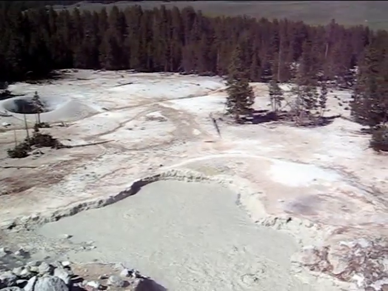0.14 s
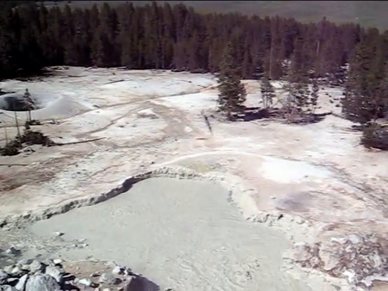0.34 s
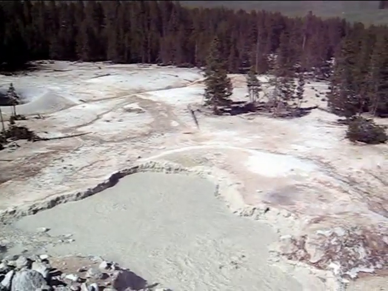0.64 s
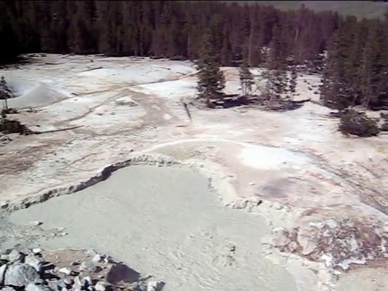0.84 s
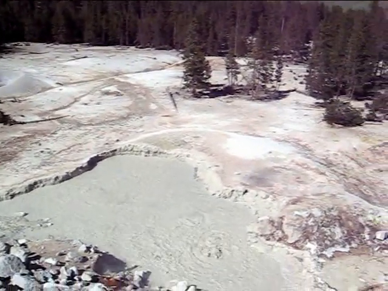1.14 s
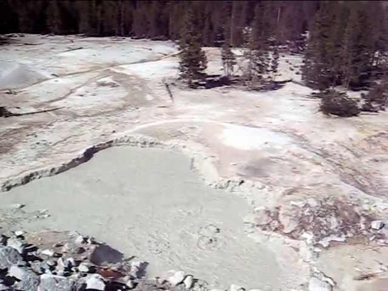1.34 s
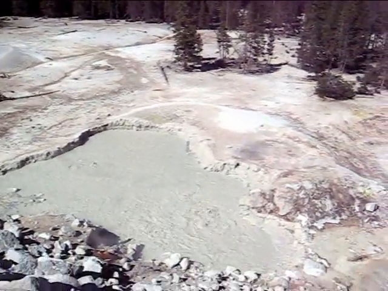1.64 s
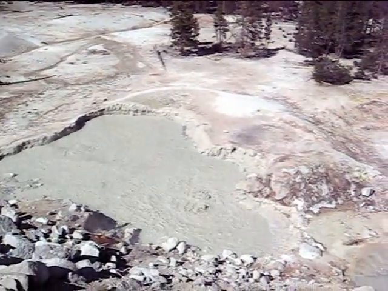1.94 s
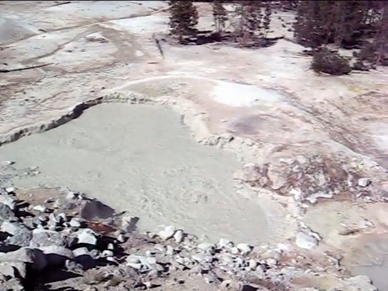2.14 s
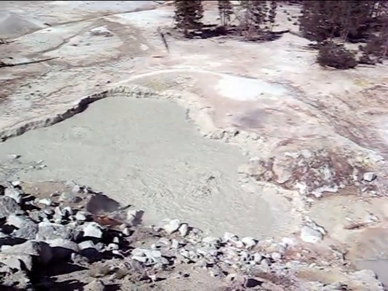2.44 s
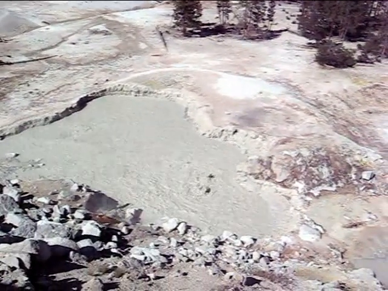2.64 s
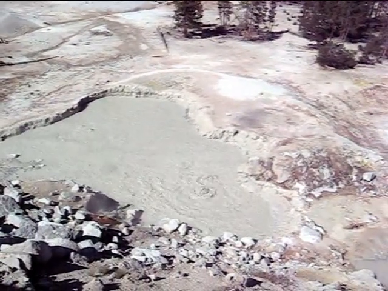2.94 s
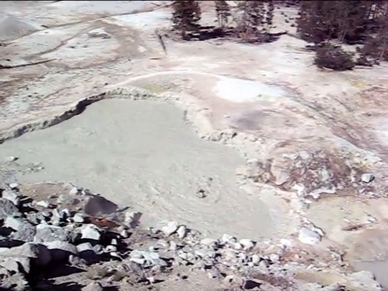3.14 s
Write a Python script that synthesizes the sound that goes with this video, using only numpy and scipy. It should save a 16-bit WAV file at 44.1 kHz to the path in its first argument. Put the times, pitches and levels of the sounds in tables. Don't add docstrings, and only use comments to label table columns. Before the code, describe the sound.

A thermal mud pool seethes throughout with grainy hiss, wet splats and hollow plops. Behind it an eight-cylinder engine coasts, its hollow pipe ring fading as pitch sags until 0.7 s; it catches by 0.9 s and pulls away with a deep, loping boom over tyre roar and low rumble. Plops cluster at 1.5-2.1 s, then thin out, with a blunt one near 3.2 s. Outdoors, dull small camera microphone, automatic gain.

```python
import sys
import numpy as np
from scipy import signal
from scipy.io import wavfile
from scipy.ndimage import uniform_filter1d

SR = 44100
rng = np.random.default_rng(int(sys.argv[2]) if len(sys.argv) > 2 else 0)


def natural_amplitude(level_db):
    exponent = np.asarray(level_db, float) / 20
    return 10 ** exponent


def unload_audio(sound):
    columns = np.transpose(np.atleast_2d(sound))
    steps = np.round(np.clip(columns, -1, 1) * 32767)
    wavfile.write(sys.argv[1], SR, steps.astype(np.int16))


N = 144648
RUN_IN = 4096


def rms_one(x):
    return x / np.sqrt(np.mean(x ** 2) + 1e-20)


def in_time(rows):
    s, *columns = np.transpose(rows)
    return [np.interp(np.arange(N) / SR, s, c) for c in columns]


def drift(rate_hz):
    hop = 40
    pole = np.exp(-2 * np.pi * rate_hz * hop / SR)
    noise = rng.standard_normal(N // hop + 2002)
    slow = signal.lfilter([1], [1, -2 * pole, pole * pole], noise)[2000:]
    return np.interp(np.arange(N) / hop, np.arange(len(slow)), rms_one(slow - slow.mean()))


def banded(spectrum, white, shared_db, own_db):
    hz, db = np.transpose(spectrum)
    edges = hz[0] * 2 ** np.arange(-1 / 3, np.log2(hz[-1] / hz[0]) + 1 / 3, 1 / 3)
    out, together = 0, drift(22.0)
    for k, (low, high) in enumerate(zip(edges, edges[1:])):
        bandpass = signal.butter(2, [low, high], "band", fs=SR, output="sos")
        band = signal.sosfilt(bandpass, white[k % 2])[RUN_IN:]
        level_db = np.interp(np.log(low * high) / 2, np.log(hz), db)
        out = out + band * natural_amplitude(level_db + shared_db * together + own_db * drift(15.0))
    return rms_one(out)


def pool(seethe_db):
    # frequency in Hz, level in dB per Hz.
    seethe_colour = [(530, -23.5), (900, -11), (949, -14), (1270, 0.5), (1980, -7.5), (2850, -10),
                     (3070, -10), (5500, -17), (7150, -42.5), (12100, -120)]
    spatter_per_s, spatter_db, spread_db = 900, -7.5, 8
    sizes = natural_amplitude(spread_db * np.minimum(rng.exponential(1, N), 3.5)) * rng.choice([-1, 1], N)
    chance = spatter_per_s * natural_amplitude(5.0 * drift(20.0)) / SR
    clicks = sizes * (rng.random(N) < chance)
    spatter = np.pad(rms_one(clicks), (RUN_IN, 0), "reflect")
    white = rng.standard_normal((2, N + RUN_IN)) + natural_amplitude(spatter_db) * spatter
    return natural_amplitude(seethe_db + 4) * banded(seethe_colour, white, shared_db=1.0, own_db=.5)


def engine():
    # time in seconds, firing rate in Hz, firing tone in dB,
    # exhaust boom in dB, uneven-bank lope in dB.
    revs = [(0, 74.2, -35.5, -48, -47.5), (.3, 70, -34, -52, -49), (.55, 61.9, -36, -34.5, -41.5),
            (.67, 58.9, -29, -38, -34), (.78, 65.1, -28.5, -26.5, -43.5), (.88, 71.16, -33, -19.5, -38),
            (1.0, 75.97, -35.5, -22, -37.5), (1.2, 77.38, -36, -24, -36.5), (1.4, 78.44, -34.5, -24, -35),
            (1.58, 82.8, -47, -30.5, -32), (1.72, 83.53, -35.5, -25.5, -34.5), (1.98, 77.1, -42, -24, -33),
            (2.18, 74.74, -38.5, -19.5, -43.5), (2.45, 73.16, -42, -19.5, -42.5),
            (2.78, 73.87, -36.5, -19, -40.5), (2.92, 75.85, -37, -22.5, -33),
            (3.05, 78.36, -34, -25.5, -36), (3.28, 78, -34.5, -20.5, -34.5)]
    # multiple of firing rate, level in dB, share of the lope's swing.
    side_orders = [(.625, -46, .4), (.75, -46, .2), (1.625, -51, .8), (3, -45, .6), (3.25, -47, .5),
                   (3.5, -48, .5), (4, -49, .2)]
    wobble_db, side_wobble_db = .9, 0.5
    lope_phase, limp_phase = 0.26, 1.3

    hz, firing_db, boom_db, lope_db = in_time(revs)
    wander = .03 * drift(18.0)
    turn = 2 * np.pi * np.cumsum(uniform_filter1d(hz, size=3000)) / SR + wander
    lope_swing = lope_db - lope_db.mean()

    def tone(order, db, wobble, phase):
        return np.sqrt(2) * natural_amplitude(db + wobble * drift(5.6)) * np.sin(order * turn + phase)

    out = tone(1, firing_db, wobble_db, 0)
    out += tone(2, boom_db, wobble_db / 2, 0)
    out += tone(7 / 4, lope_db - 2.5, wobble_db, -lope_phase)
    out += tone(9 / 4, -41.5 + 0.57 * lope_swing, wobble_db, lope_phase)
    out += tone(15 / 8, -41.5, wobble_db, limp_phase)
    for order, db, share in side_orders:
        phase = rng.uniform(0, 2 * np.pi)
        out += tone(round(order * 8) / 8, db + share * lope_swing, side_wobble_db, phase)
    return out + coasting_pipe()


def coasting_pipe():
    pipe_hz, width_hz, pipe_db, rise_s, fade_s = 141.3, 3.3, -32, .35, .6
    t = np.arange(N) / SR
    phase = 2 * np.pi * np.cumsum(pipe_hz + width_hz * drift(3.7)) / SR
    ring = natural_amplitude(0.7 * drift(4.0)) * np.sin(phase)
    swell = np.clip(0.13 + t / rise_s, 0, 1) / (1 + (t / fade_s) ** 8)
    return np.sqrt(2) * natural_amplitude(pipe_db) * ring * swell


def road(roar_db):
    # frequency in Hz, level in dB per Hz.
    roar_colour = [(180, -21.5), (300, -2.5), (400, -2), (570, 0.5), (805, 2), (1000, -5.5), (1500, -17),
                   (2200, -120)]
    rumble_colour = [(30, -10), (48, 3), (100, 2.5), (150, -1), (230, 5), (320, -7), (450, -11)]
    roar_noise = rng.standard_normal((2, N + RUN_IN))
    roar = natural_amplitude(roar_db - 0.23) * banded(roar_colour, roar_noise, shared_db=1.0, own_db=0.0)
    rumble_noise = rng.standard_normal((2, N + RUN_IN))
    rumble = banded(rumble_colour, rumble_noise, shared_db=0.6, own_db=-2.5)
    rumble_db = -33.5 + 0.59 * (roar_db - roar_db.mean())
    return roar + natural_amplitude(rumble_db) * rumble


def splats():
    # start in seconds, peak level in dB.
    landings = [(0.0478, -27), (0.1635, -26.5), (0.6772, -19.5), (0.7166, -35), (0.8624, -35),
                (0.8964, -23), (1.0202, -36), (1.0984, -26), (1.5174, -25), (1.7262, -26.5), (1.7803, -22),
                (1.854, -32), (1.924, -28), (1.9687, -29.5), (2.7791, -29.5), (2.9548, -24), (3.0679, -25),
                (3.235, -25.5)]
    t60_s, trim_db = .022, -1
    out, t = np.zeros(N + SR), np.arange(SR // 20) / SR
    for s, db in landings:
        decay = natural_amplitude(db + trim_db - 60 * t / t60_s)
        out[int(s * SR):][:len(t)] += decay * rng.standard_normal(len(t))
    bright = signal.butter(2, [900, 5000], "band", fs=SR, output="sos")
    return signal.sosfilt(bright, out[:N])


def plops():
    # start in seconds, peak level in dB, pitch in Hz, ring length in cycles.
    bubbles = [(.08, -31, 224, 5.4), (.09, -24.5, 585, 14), (.2, -24.5, 562, 10), (.3, -31, 530, 9.3),
               (0.352, -24, 228, 3.6), (.43, -25, 230, 7.2), (0.609, -21.5, 151.5, 8.5),
               (.68, -22, 505, 11), (0.79, -24.5, 232, 7), (1.44, -26.5, 265, 6.5), (1.545, -27, 550, 10),
               (1.56, -27, 680, 12), (1.605, -25, 833, 8.8), (1.695, -19.5, 820, 18),
               (1.775, -20, 445, 6.7), (1.84, -33, 229.8, 8.3), (1.85, -24, 890, 12),
               (1.88, -21.5, 706, 10), (1.935, -21.5, 677, 13), (1.94, -21.5, 816, 12),
               (2.0, -19, 850, 6.3), (2.145, -24, 500, 10), (2.695, -26, 1255, 12.3),
               (3.2062, -18, 791.5, 2.1)]
    rise_share, glide = .25, .01
    out, t = np.zeros(N + SR), np.arange(SR // 5) / SR
    for s, db, hz, cycles in bubbles:
        life = cycles / hz
        rise = 1 - np.exp(-(t / (rise_share * life)) ** 2)
        ring = np.sin(2 * np.pi * hz * t * (1 + glide * t / life / 2))
        out[int(s * SR):][:len(t)] += natural_amplitude(db) * rise * np.exp(-t / life) * ring
    return out[:N]


def scene():
    # time in seconds, pool seethe in dB, road roar in dB.
    flow = [(0, -36.5, -27.5), (.25, -37, -28), (.45, -39.5, -30), (.68, -37, -29.5), (.9, -40.5, -31),
            (1.04, -41, -32), (1.13, -38.5, -31), (1.3, -40, -33.5), (1.5, -39, -31.5),
            (1.57, -36.5, -29.5), (1.95, -38, -30.5), (2.2, -40.5, -33.5), (2.4, -43, -35),
            (2.8, -41, -34.5), (3.1, -38.5, -33.5), (3.28, -42, -35)]
    seethe_db, roar_db = in_time(flow)
    mix = pool(seethe_db) + engine() + road(roar_db) + splats() + plops()
    return mix[None]


def low_pass(x):
    return signal.sosfilt(signal.butter(12, 15140, fs=SR, output="sos"), x)


def record(dry):
    ceiling, offset, keep_every = 0.46, -.0067, 4
    wide = np.pad(dry, ((0, 0), (RUN_IN, RUN_IN)), "reflect", reflect_type="odd")
    n = np.arange(wide.shape[1])
    rounded = ceiling * np.tanh(wide / ceiling)
    low = signal.sosfilt(signal.butter(6, 5790, fs=SR, output="sos"), rounded)
    sparse = keep_every * (low + offset) * (n % keep_every == 0)
    taps = signal.firwin(numtaps=33, cutoff=5526, window=("kaiser", 5.2), fs=SR)
    smooth = signal.lfilter(taps, 1, sparse)
    fold_hz, fold_db = 14927, -79
    bass = signal.sosfilt(signal.butter(2, 250, fs=SR, output="sos"), low)
    smooth = smooth + natural_amplitude(fold_db) * bass * np.cos(2 * np.pi * fold_hz * n / SR)
    smooth = smooth[:, RUN_IN + 16:RUN_IN + 16 + N]
    fade_s = .002
    edge = np.minimum(np.arange(N), np.arange(N)[::-1]) / (fade_s * SR)
    return low_pass(smooth * np.sin(np.pi / 2 * np.clip(edge, 0, 1)) ** 2)


dry = scene()
out = record(dry)
unload_audio(out)
```